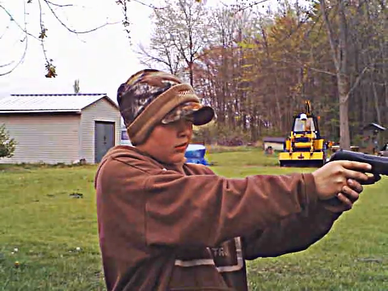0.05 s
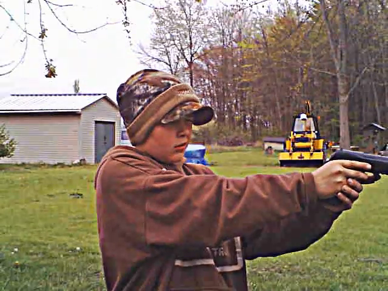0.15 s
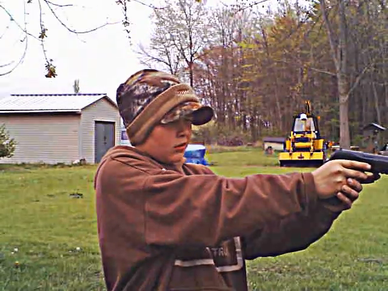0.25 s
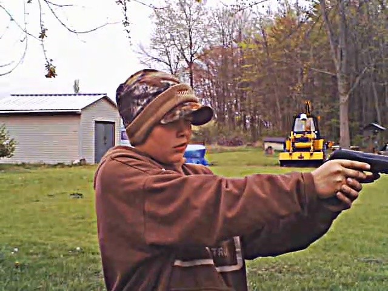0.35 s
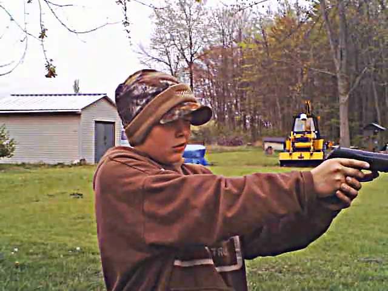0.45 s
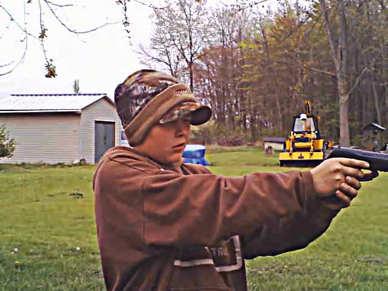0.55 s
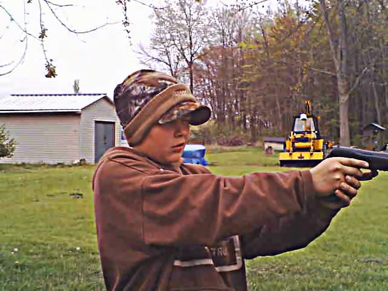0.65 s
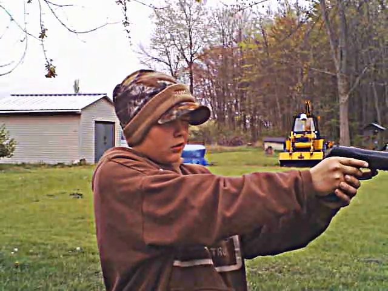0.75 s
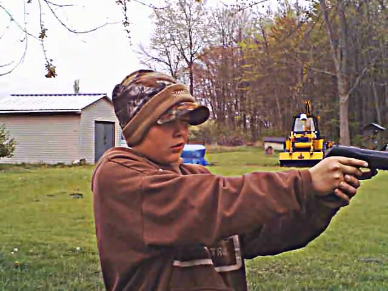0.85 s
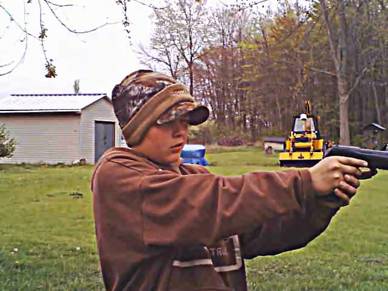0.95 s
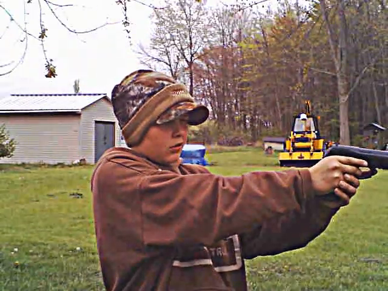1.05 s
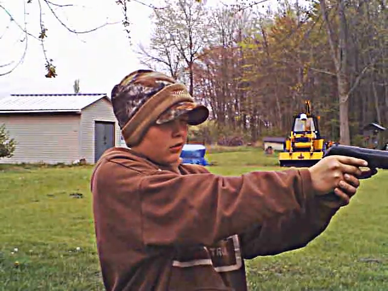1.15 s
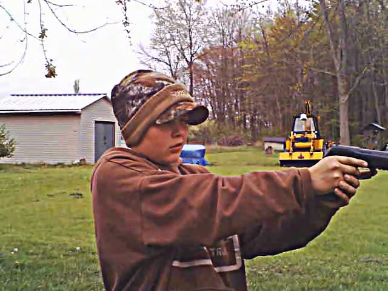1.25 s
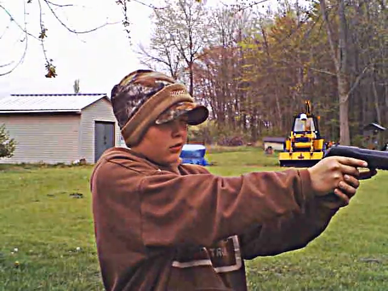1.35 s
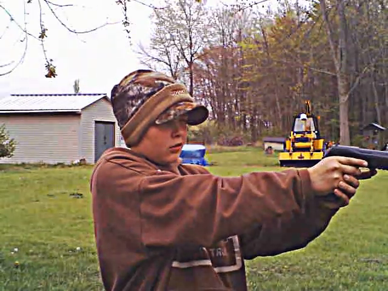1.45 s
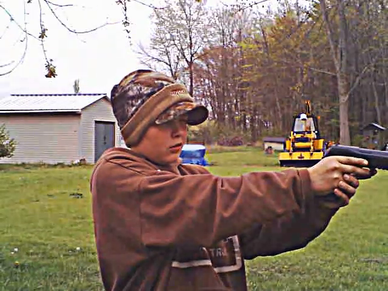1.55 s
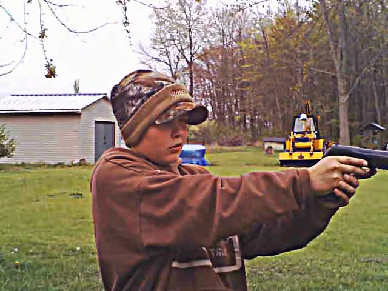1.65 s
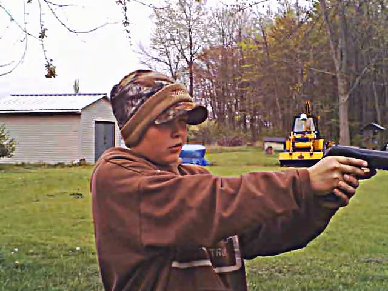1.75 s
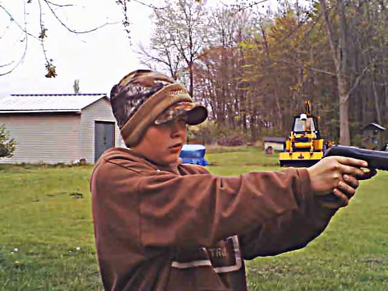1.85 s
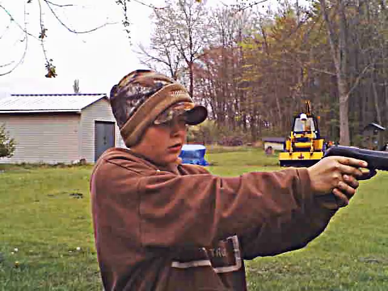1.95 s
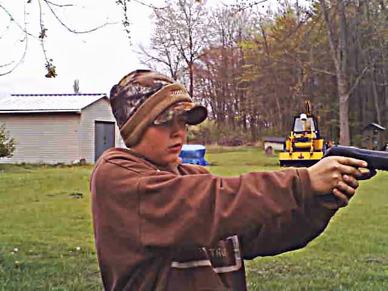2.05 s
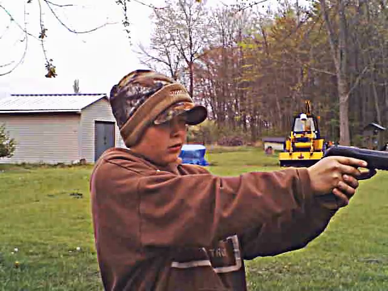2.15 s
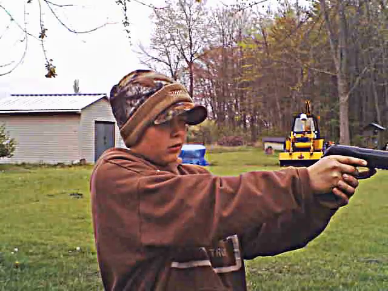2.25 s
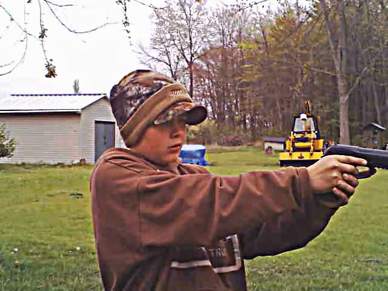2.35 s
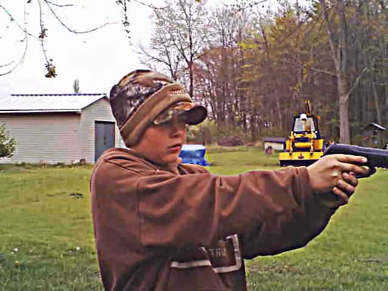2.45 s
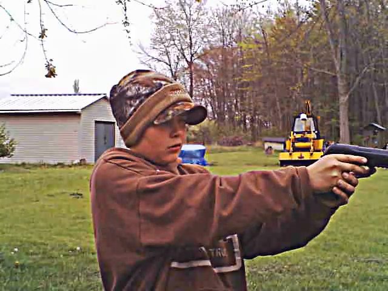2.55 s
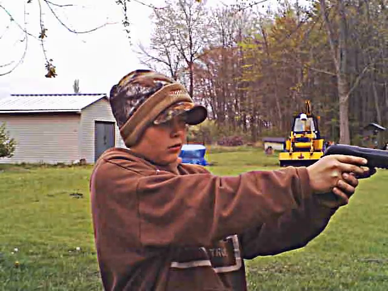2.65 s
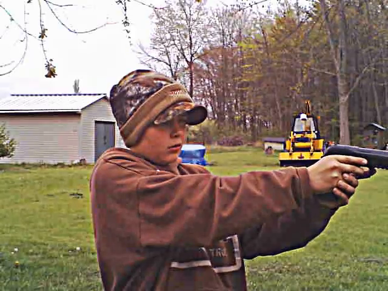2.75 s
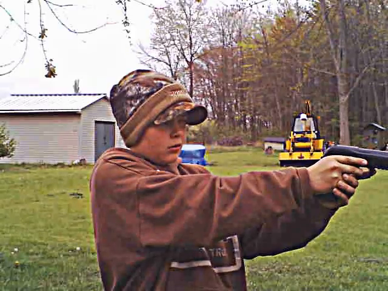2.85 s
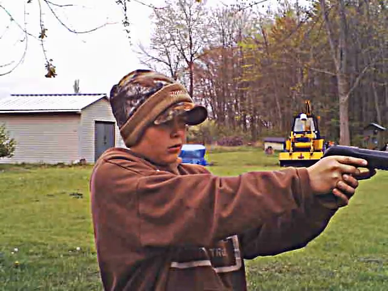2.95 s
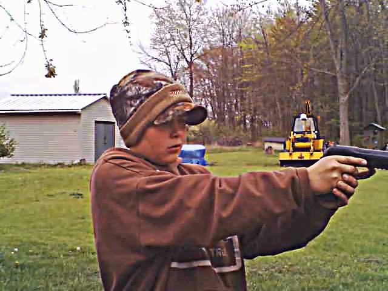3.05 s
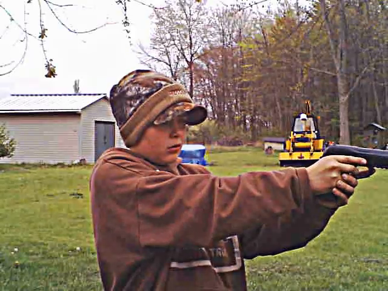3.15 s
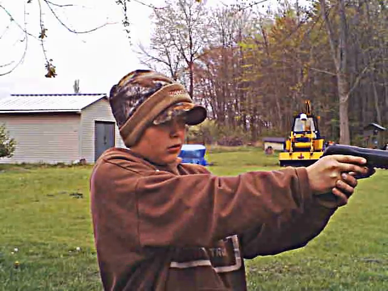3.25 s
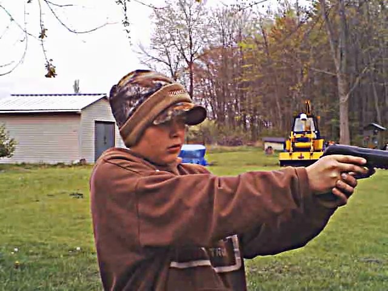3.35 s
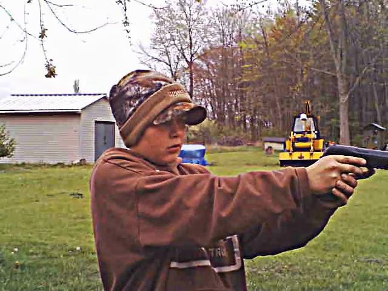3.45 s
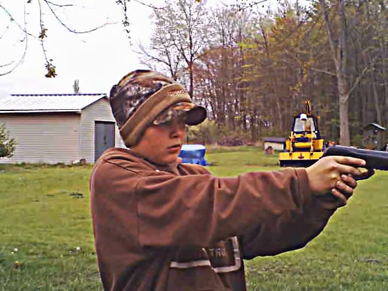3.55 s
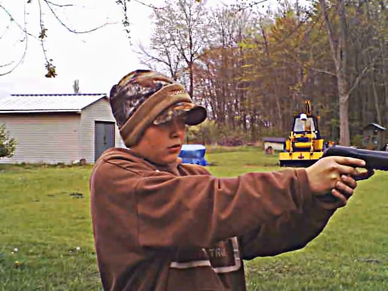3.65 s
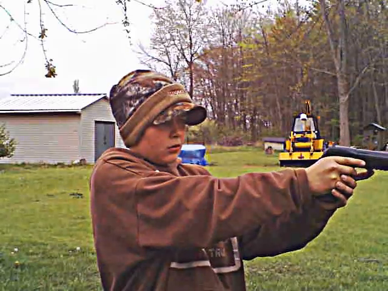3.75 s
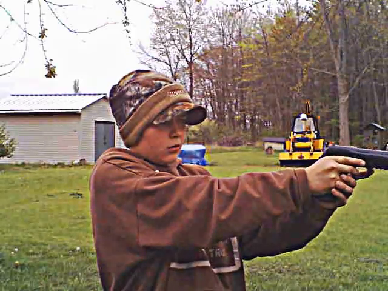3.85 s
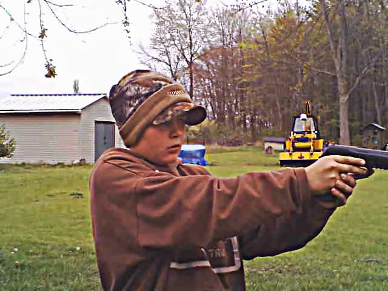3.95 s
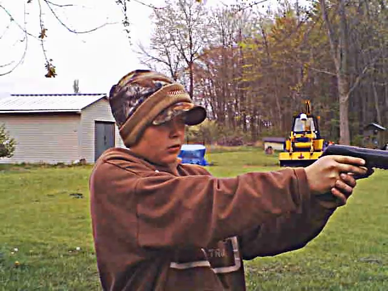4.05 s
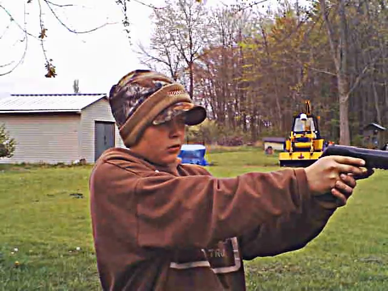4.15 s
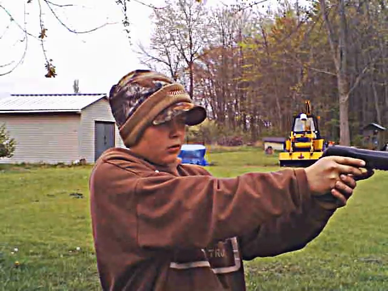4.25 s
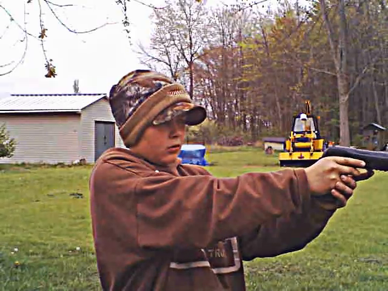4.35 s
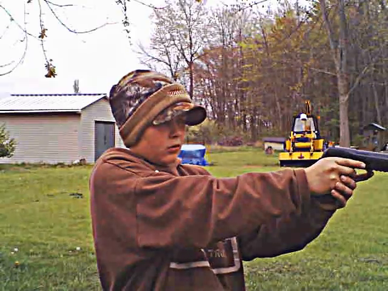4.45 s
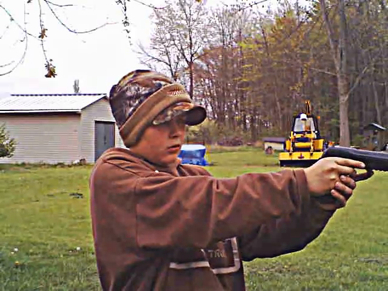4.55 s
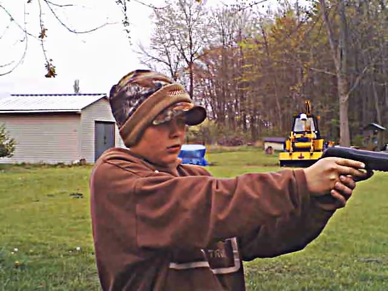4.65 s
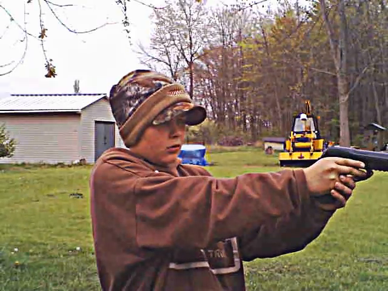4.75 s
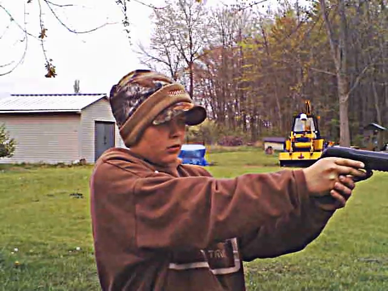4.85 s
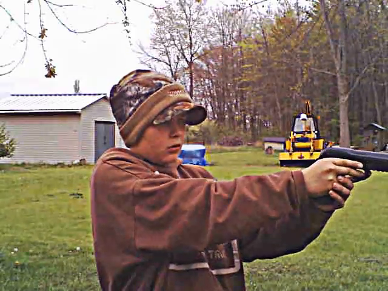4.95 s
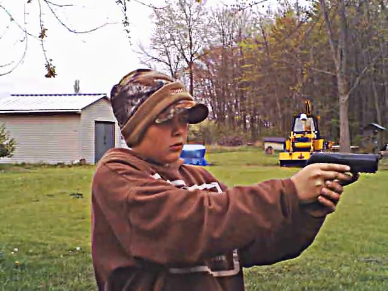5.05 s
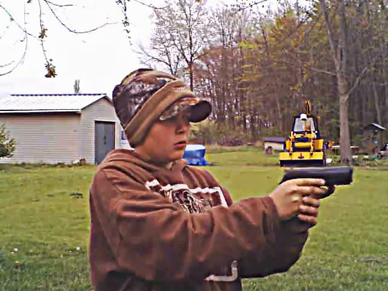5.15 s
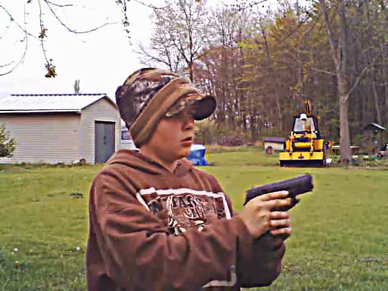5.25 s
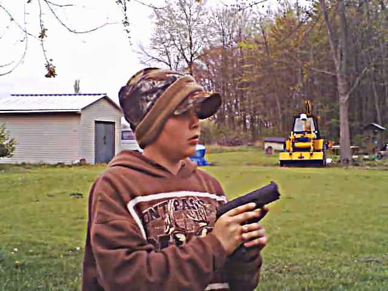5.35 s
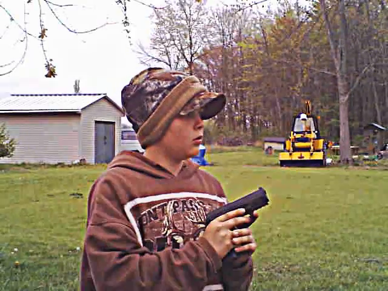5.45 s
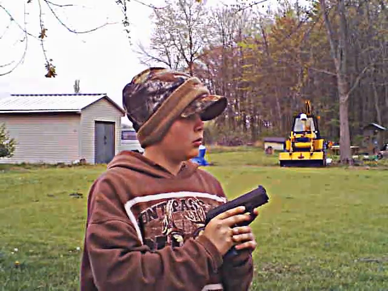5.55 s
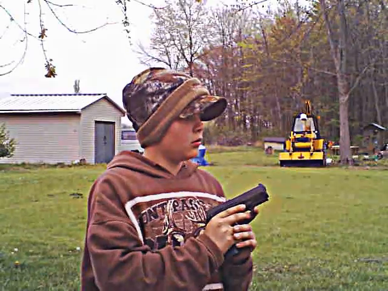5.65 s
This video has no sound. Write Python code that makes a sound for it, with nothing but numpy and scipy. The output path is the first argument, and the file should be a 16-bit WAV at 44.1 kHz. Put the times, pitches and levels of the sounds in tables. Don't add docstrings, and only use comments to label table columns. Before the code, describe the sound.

Outdoors in a grassy yard, a small gas pistol fires five times close to a cheap camera microphone, roughly every 0.7 to 1 second. Each shot is a hard, slightly clipped pop with a burst of bright gas hiss, short slaps from nearby walls and a faint tail from the trees. Light metallic trigger clicks fall between shots, over low wind rumble, hiss and faint buzz.

```python
import sys
import numpy as np
from scipy import signal
from scipy.fft import rfft, irfft, next_fast_len
from scipy.io import wavfile
from scipy.ndimage import map_coordinates

SR = 44100
rng = np.random.default_rng(int(sys.argv[2]) if len(sys.argv) > 2 else 0)


def int16_out(signal):
    q = np.round(np.clip(np.atleast_2d(signal).T, -1, 1) * 32767)
    wavfile.write(sys.argv[1], SR, q.astype(np.int16))


def rack_gain(trim_db):
    fader = np.asarray(trim_db, float)
    return 10 ** (fader / 20)


N = 250864


def unit(x):
    return x / np.sqrt(np.mean(x ** 2) + 1e-20)


def along(points, at):
    return np.interp(at, *np.transpose(points))


def filtered(x, response):
    m = next_fast_len(len(x) + 8192)
    return irfft(rfft(x, m) * response(np.fft.rfftfreq(m, 1 / SR)), m)[:len(x)]


def modes(table):
    def response(f):
        total = 0
        for k, (centre, width, db) in enumerate(table):
            damping = 1j * f * width
            total = total + (-1) ** k * rack_gain(db) * damping / (centre * centre - f * f + damping)
        return total
    return response


def noise(spectrum, size):
    f, db = np.transpose(spectrum)
    white = rng.standard_normal(size)
    return unit(filtered(white, lambda hz: rack_gain(np.interp(np.log(hz + 1), np.log(f), db))))


def add(track, s, sound):
    part = track[round(s * SR):][:len(sound)]
    part += sound[:len(part)]


def wind_rumble():
    # f/Hz, level/dB per Hz
    rumble_colour = [(10, -33.5), (20, -0.5), (45, -3.5), (57, 2), (70, -1.5), (130, -5.5), (230, -8),
                     (330, -14.5), (600, -16.5), (1500, -36.5)]
    # t/s, level/dB
    wind_level = [(0, -53.5), (1.9, -53.5), (3.4, -53.5), (4.3, -53), (5.69, -55)]
    t = np.arange(N) / SR
    lumps = map_coordinates(rng.standard_normal(80), [t * 11.0])
    rumble = unit(rack_gain(0.53 * lumps) * noise(rumble_colour, N))
    return rack_gain(along(wind_level, t) + 2.5) * rumble


def amplifier_hiss():
    # f/Hz, level/dB per Hz
    hiss_colour = [(200, -5), (600, -2), (1400, -6), (2100, -13), (3300, -15), (5000, -19), (9300, -21),
                   (12000, -19), (14200, -21), (15600, -30), (15900, -44)]
    return rack_gain(-59.5) * noise(hiss_colour, N)


def converter_whistle():
    return rack_gain(-65) * np.sin(2 * np.pi * 14610.4 * np.arange(N) / SR)


def packets():
    # start t/s, end t/s
    holds = [(.0035, .0118), (.0165, .0248), (.0825, .0905), (.1165, .133)]
    # start t/s, end t/s
    stalls = [(1.177, 1.195), (3.686, 3.712), (5.598, 5.64)]
    frames_s = .13315
    first_s, period_s, lasts_s, packet_s = .0188, .03602, .025, .00363
    starts = []
    for first in np.arange(first_s - period_s, N / SR, period_s):
        s = first + rng.normal(0, .001)
        while s < first + lasts_s:
            s += sum(end - s % frames_s for start, end in holds if start <= s % frames_s < end)
            if 0 <= s < min(first + lasts_s, N / SR):
                starts.append(s)
            s += packet_s
    return [s for s in starts if not any(a < s < b for a, b in stalls)]


def buzz():
    # start t/ms, end t/ms, size [ratio], ripple [ratio]
    packet_current = [
        (0, .55, 1, .7),
        (.95, 1.42, .9, .75),
        (1.58, 2.0, .85, 1.1),
        (2.07, 2.62, .75, 1),
    ]
    # f/Hz, width/Hz, level/dB
    chatter = [(2800, 830, 1.5), (4504, 300, 1.5), (6226, 390, 3.5), (7900, 990, -4), (10180, 690, -0.5),
               (11400, 700, 1.5), (13300, 1300, 1.5)]
    current, busy, ms = np.zeros(N), np.zeros(N), np.arange(160) / SR * 1000
    starts = packets()
    for s, chance in zip(starts, rng.standard_normal((len(starts), 9))):
        slip = .07 * chance[8]
        for k, (start, end, size, ripple) in enumerate(packet_current):
            on = ms >= start + .025 * chance[k] + slip
            flowing = on * (ms < end + .025 * chance[k + 4] + slip)
            add(current, s, size * flowing)
            add(busy, s, ripple * flowing)
    sag = filtered(current, lambda f: 1j * f / (200 + 1j * f) / (1 + 1j * f / 6000) ** 2)
    clock = filtered(rng.standard_normal(N), modes(chatter))
    ripple = unit(filtered(busy * clock, modes(chatter)))
    return rack_gain(-43) * sag + rack_gain(-58.5) * ripple


def trigger():
    # t/s, peak level/dB, reset [0 = sear taken up .. 1 = sear resets], rattle t60/s
    clicks = [(.7177, -29, 0.067, 0.033), (1.6522, -26, 0.64, 0.064), (1.865, -38, 0.99, 0.016),
              (2.2095, -25, 0.013, 0.012), (2.5946, -26.5, 0.71, 0.083), (2.8, -45, 1, 0.016),
              (3.076, -26.5, 0.095, 0.026), (3.3575, -25, 0.47, 0.064), (3.555, -40, 0.76, 0.024),
              (3.7705, -29.5, -0.67, 0.038), (4.0493, -26, 0.78, .04), (4.5132, -28.5, 0.36, 0.074),
              (4.7951, -28, 0.67, 0.048), (5.564, -39, -0.79, 0.09)]
    # f/Hz, width/Hz, take-up level/dB, reset level/dB
    frame_modes = [(1540, 900, -3.5, -9), (3130, 2300, -2.5, 2), (5000, 1400, -10, -5),
                   (8440, 470, -2.5, 5), (11500, 940, -15, -19)]

    def contact(f):
        return rack_gain(-7) * 1j * f / (1500 + 1j * f) / (1 + 1j * f / 9000)

    out, t = np.zeros(N), np.arange(SR // 10) / SR
    for s, db, reset, t60 in clicks:
        crack = rack_gain(-60 * t / (.012 + .012 * abs(reset)))
        rattle = rack_gain(-2.5 - 60 * t / abs(t60))
        second_hit = rack_gain(-28 - 60 * np.abs(t - .0042) / 0.01) * (t > .0042)
        force = (crack + rattle + second_hit) * rng.standard_normal(len(t))
        frame = [(c, w, up + reset * (back - up)) for c, w, up, back in frame_modes]
        click = filtered(force, lambda f: modes(frame)(f) + contact(f))
        add(out, s, rack_gain(db) * click / np.abs(click).max())
    return out


def answers(t, column, loss):
    zones = [
        (.006, 0.0031, 0.062, -26.5, -15.5),
        (0.019, 0.012, 0.094, -24.5, -15),
        (0.045, 0.024, 0.21, -48.5, -31),
        (0.111, 0.033, 1.1, -51.5, -47.5),
        (0.346, 0.057, 1.4, -54, -84),
        (0.599, .1, 3.1, -65.5, -98),
    ]
    power = 0
    for row in zones:
        arrival, held, t60 = row[:3]
        rise_s = min(0.68 * arrival, 0.054)
        rise_db = -20 * np.maximum(arrival - t, 0) / rise_s
        decay_db = -60 * np.maximum(t - arrival - held, 0) / (loss * t60)
        power = power + rack_gain(row[column] + rise_db + decay_db) ** 2
    return np.sqrt(power)


def scattered_pop(t):
    # f/Hz, level/dB per Hz
    near_colour = [(80, -29.5), (140, -17.5), (250, 9), (800, -5.5), (1400, -10.5), (2500, -17),
                   (5000, -20.5), (8000, -43)]
    # f/Hz, level/dB per Hz
    far_colour = [(200, -22), (600, 2.5), (1500, 4), (3300, 1.5), (5000, -7.5), (9000, -21.5), (15000, -44)]
    far = np.clip((t - .05) / 0.13, 0, 1)
    diffuse = np.sqrt(1 - far) * noise(near_colour, len(t)) + np.sqrt(far) * noise(far_colour, len(t))
    trunks = rack_gain(3 * noise([(20, 4), (250, 0.0), (600, -31)], len(t)))
    return answers(t, column=3, loss=1) * trunks * diffuse


def slapbacks(t):
    slaps = [(.0609, -21, 2800), (.0697, -28, 3000), (.0723, -21, 2600), (.0809, -24, 2400),
             (.1061, -33, 3800), (.1252, -27, 1900), (.1256, -26, 3300), (.1338, -33, 1800),
             (.1348, -32, 2200), (.1418, -29, 2600), (.1503, -36, 2800), (.172, -38, 4500),
             (.1776, -38, 3000), (.2175, -36, 2300), (.2437, -36, 3000), (.2665, -39, 3000),
             (.2725, -39, 2600), (.349, -40, 2800), (.402, -39, 2600)]
    out = 0
    for s, db, hz in slaps:
        u = t - s
        window = np.exp(-(u * hz / .62) ** 2)
        out = out + rack_gain(db) * window * np.sin(2 * np.pi * hz * u * (1 - 150 * u))
    return rack_gain(-1.5) * out


def body_ring(t):
    # f/Hz, level/dB, t60/s
    body_modes = [(237.4, -12.5, 0.1), (580, -19, 0.023), (672, -23.5, 0.12), (789.2, -10, 0.083),
                  (1045, -21.5, 0.041), (1205, -24.5, .07), (1330, -16, 0.068), (1990, -22, 0.12)]
    since = np.maximum(t - .0046, 0)
    ring = sum(rack_gain(db - 60 * since / t60) * np.sin(2 * np.pi * hz * since) for hz, db, t60 in body_modes)
    return ring * (1 - np.exp(-since / .0015))


def pulses():
    wall_loss = [-9, -21]
    tick_s, tick_gap_s, tick_ms = .0018, .00093, .095
    push_ms, pull_lead_s = .23, .00235
    pull_db, pull_fade_db = -3, 16
    wall_s = .0175
    ticks = [(tick_s + k * tick_gap_s, db, (-1) ** k * tick_ms) for k, db in enumerate([-26, -17, -16, -19])]
    bounces = zip([.00895, .0129, .0165, .0205], [-4.5, -15, -3, -9])
    pushes = [(s, db, push_ms) for s, db in bounces]
    pulls = [(s - pull_lead_s, pull_db - k * pull_fade_db, -ms) for k, (s, _, ms) in enumerate(pushes)]
    returns = []
    for k, loss in enumerate(wall_loss):
        returns += [(s + (k + 1) * wall_s, db + loss, ms) for s, db, ms in pushes + pulls]
    return ticks + pushes + pulls + returns


def pulse_train(t):
    train = 0
    for s, db, ms in pulses():
        u = np.clip((t - s) * 1000 / ms, -20, 20)
        train = train + rack_gain(db) * u * np.exp(.5 - u * u / 2)
    return 0.69 * train


def pop(t):
    return pulse_train(t) + slapbacks(t) + body_ring(t) + scattered_pop(t)


def gas_jets(t):
    # t/s after release, level/dB, held t/s, t60/s
    jets = [
        (.0008, -31, .002, .02),
        (.0026, -25, .003, .02),
        (.0054, -9, .001, .006),
        (.0061, 3, .0022, .006),
        (.0103, 0, .0006, .02),
        (.0152, 3, .0007, .007),
        (.0192, 1, .0003, .008),
        (.0237, -10, .0003, .006),
    ]
    # f/Hz, level/dB per Hz
    jet_colour = [(710, -40.5), (1200, -9), (2020, -8), (2710, -11), (2960, -10), (4150, -11.5), (5330, -4),
                  (5880, -9.5), (11000, 1), (15100, -13), (16200, -34)]
    # f/Hz, width/Hz, level/dB
    muzzle_modes = [(7790, 900, -18), (9530, 3400, 6), (6300, 250, -8.5)]
    opening = 0
    for s, db, held, t60 in jets:
        decay_db = -60 * np.maximum(t - s - held, 0) / t60
        opening = opening + rack_gain(db + rng.normal(0, 1) + decay_db) * (t >= s)
    broad = noise(jet_colour, len(t))
    jet = unit(0.69 * broad + unit(filtered(broad, modes(muzzle_modes))))
    return rack_gain(-5.5) * opening * jet


def scattered_gas(t):
    # f/Hz, level/dB per Hz
    spray_colour = [(710, -37.5), (1200, -2), (1780, -5), (2660, -10.5), (3520, -5), (4430, -7.5),
                    (6480, -1.5), (8410, 0), (10800, 2.5), (16200, -11.5)]
    flutter = 3.5 * np.clip(t / .08, 0, 1) * noise([(20, 0), (200, 0), (500, -40)], len(t))
    spray = noise(spray_colour, len(t))
    dull = filtered(spray, lambda f: 1 / (1 + (f / 10500) ** 4))
    late = np.clip(t / .075, 0, 1)
    spray = (1 - late) * spray + late * dull
    return answers(t, column=4, loss=0.64) * rack_gain(flutter) * spray


def pistol():
    shots = [
        1.39998,
        2.35245,
        3.13295,
        3.82304,
        4.54,
    ]
    charge = [0, 0, 0, 0, 0]
    out, t = np.zeros(N), np.arange(SR) / SR
    same_pop = pop(t)
    for s, db in zip(shots, charge):
        add(out, s, rack_gain(db) * (same_pop + gas_jets(t) + scattered_gas(t)))
    return out


def scene():
    background = wind_rumble() + amplifier_hiss() + converter_whistle()
    return (background + trigger() + pistol())[None]


def top_cut(x):
    return signal.sosfilt(signal.butter(12, 16310, fs=SR, output="sos"), x)


def record(dry):
    x = (dry + buzz())[0]
    x = x / (1 + np.abs(x / .99) ** 10) ** .1
    x = filtered(x, lambda f: 1 / (1 + (f / 15700) ** 140))
    mix = np.clip(x, -1, 1)[None]
    return top_cut(mix)


dry = scene()
out = record(dry)
int16_out(out)
```